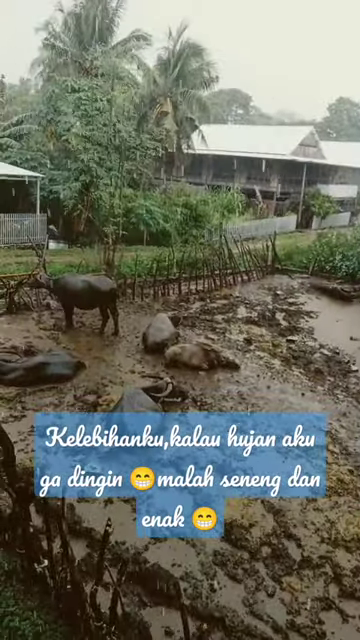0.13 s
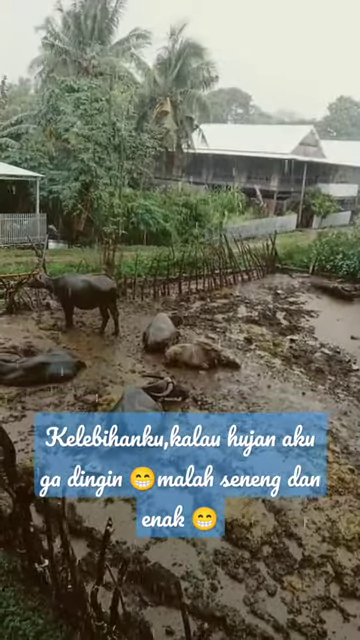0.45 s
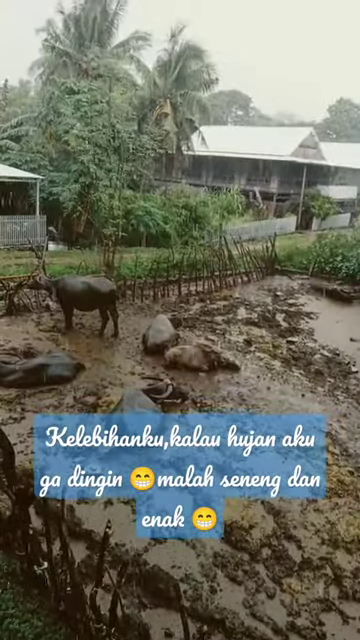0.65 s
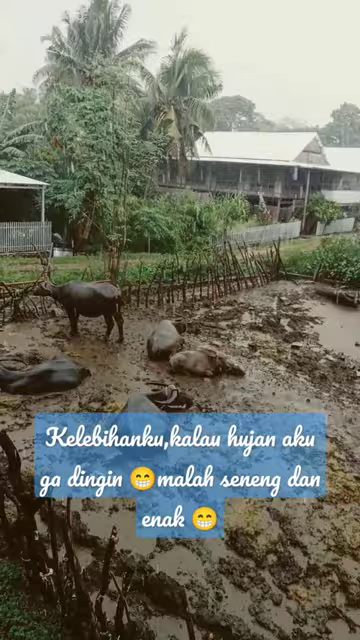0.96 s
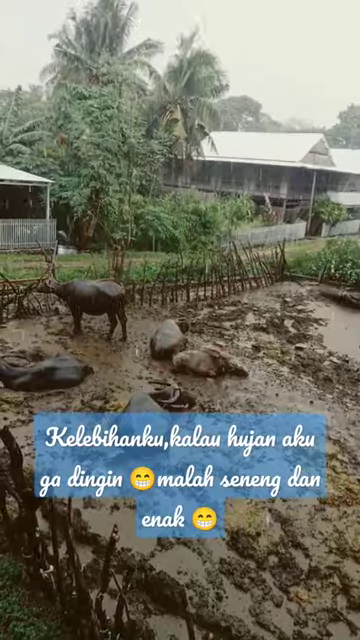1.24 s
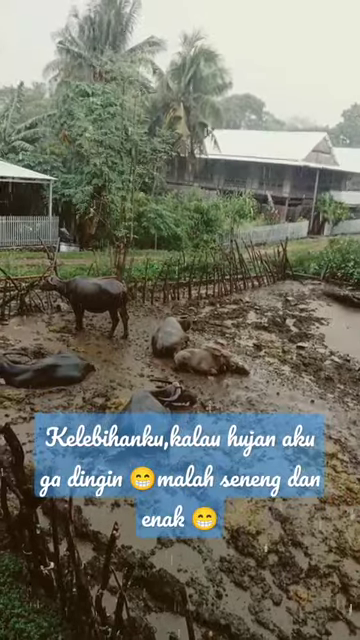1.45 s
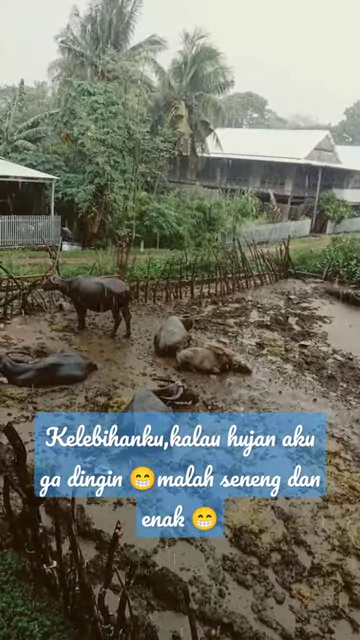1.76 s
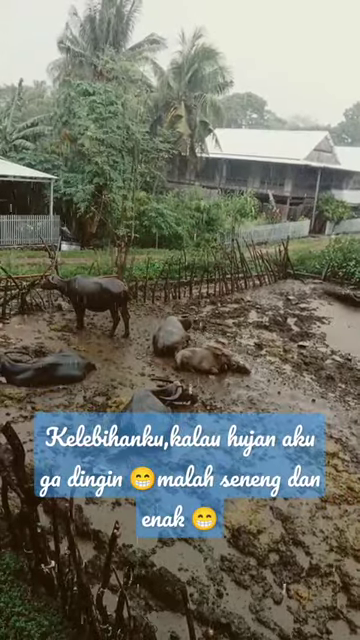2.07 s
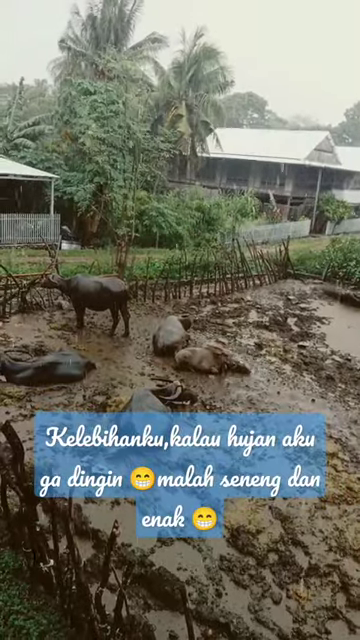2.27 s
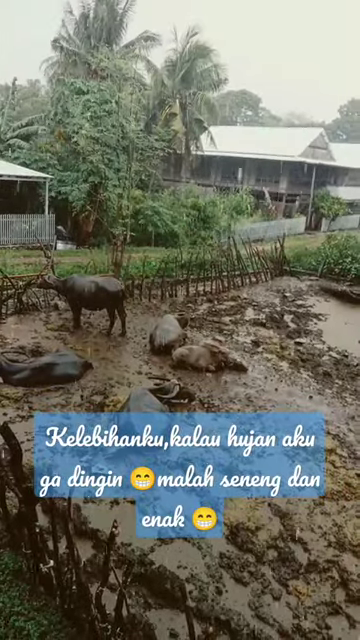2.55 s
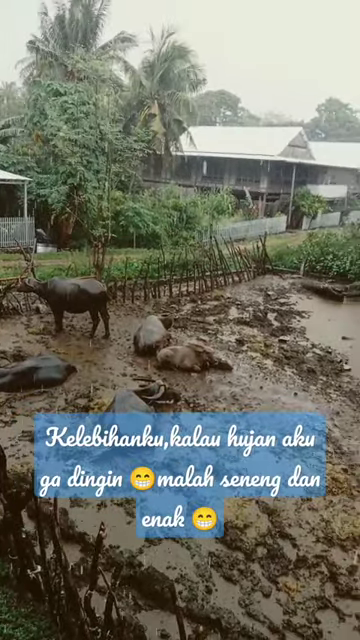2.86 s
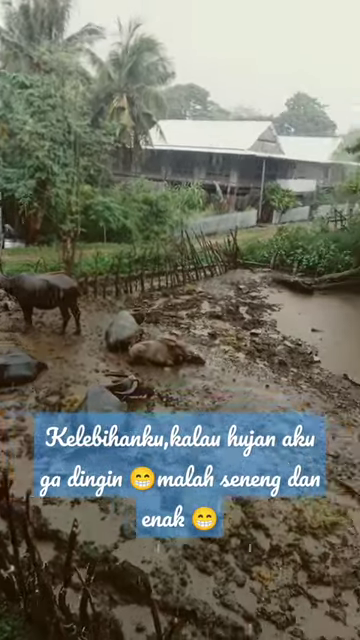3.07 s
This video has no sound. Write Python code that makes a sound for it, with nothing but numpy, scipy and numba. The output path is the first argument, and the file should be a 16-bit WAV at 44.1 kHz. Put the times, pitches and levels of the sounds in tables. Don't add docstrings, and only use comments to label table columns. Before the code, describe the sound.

Steady heavy rain falls on a muddy animal yard, a dense hiss with leaf spatter, puddle plips, scattered near splats and low drips, heard by a phone under a sheet roof.

```python
import sys
import numpy as np
from scipy import signal
from scipy.fft import rfft, irfft
from scipy.io import wavfile
from scipy.ndimage import uniform_filter1d
from numba import njit

SR = 44100
rng = np.random.default_rng(int(sys.argv[2]) if len(sys.argv) > 2 else 0)


def wav_out(sig):
    wavfile.write(sys.argv[1], SR, np.round(np.clip(np.atleast_2d(sig).T, -1, 1) * 32767).astype(np.int16))


def voltage_ratio(level):
    return 10 ** (np.asarray(level, float) / 20)


N = 141561


def unit(x):
    return x / np.sqrt(np.mean(x ** 2))


def band(x, lo_hz, hi_hz):
    edges_hz = [lo_hz, min(hi_hz, .45 * SR)]
    return signal.sosfilt(signal.butter(2, edges_hz, "band", fs=SR, output="sos"), x)


def curve(table, col):
    table = np.array(table)
    return np.interp(np.arange(N) / SR, table[:, 0], table[:, col])


def walk(rate_hz):
    hold = int(SR / rate_hz)
    steps = np.repeat(rng.standard_normal(N // hold + 1), hold)
    return 1.56 * uniform_filter1d(uniform_filter1d(steps, hold), hold)[:N]


@njit
def grains(n, at, w, cycles, glide, size, fade):
    out = np.zeros(n)
    for k in range(len(at)):
        span = int(cycles * 2 * np.pi / w[k])
        phase, start = 0., int(at[k])
        for i in range(min(span, n - start)):
            u = i / span
            phase += w[k] * (1 + glide * (u - .3))
            swell = np.sin(np.pi * u) * np.exp(-fade * (u - .3))
            out[start + i] += size[k] * np.sin(phase) * swell
    return out


def bursts(at, size, tail_s):
    smear_s = 0.0021
    power = np.zeros(N)
    np.add.at(power, np.clip(at, 0, N - 1).astype(int), size ** 2)
    power = signal.lfilter([1], [1, -np.exp(-2 / (tail_s * SR))], power)
    power = uniform_filter1d(power, int(smear_s * SR))
    return np.sqrt(np.maximum(power, 0)) * rng.standard_normal(N)


# (frequency [Hz], density [dB/Hz])
YARD_COLOUR = [(45, -25.5), (90, -20), (240, -7.5), (390, -12.5), (560, -7.5), (800, -4.5), (1500, -3.5),
               (2500, 0)]
# (frequency [Hz], gain [dB])
PORT_COLOUR = [(2700, 0), (3600, -7.5), (5000, -13), (6600, -5), (7600, -14.5), (8600, -25), (10300, -23),
               (12500, -38.5)]


def coloured(x):
    shelter_hz, shelter_wide_hz, shelter_db = 1260, 134, 1.5
    port_top_hz, port_top_wide_hz, port_top_db = 14100, 1700, 5
    hz = np.fft.rfftfreq(N, 1 / SR) + 1
    db = 0
    for table in (YARD_COLOUR, PORT_COLOUR):
        table_hz, table_db = np.array(table).T
        db = db + np.interp(np.log(hz), np.log(table_hz), table_db)

    def bump(mid_hz, wide_hz):
        return 1 / (1 + (2 * (hz - mid_hz) / wide_hz) ** 2)

    shelter = 1 + voltage_ratio(2 * shelter_db) * bump(shelter_hz, shelter_wide_hz) ** 2
    port_top = voltage_ratio(2 * port_top_db * bump(port_top_hz, port_top_wide_hz))
    return irfft(rfft(x) * voltage_ratio(db) * np.sqrt(shelter * port_top), N)


# (time [s], low edge [Hz], high edge [Hz], level [dB])
SPLIT_PATCHES = [
    (.46, 6270, 7600, -48),
    (.46, 12400, 13600, -75),
    (.6, 6300, 7600, -46),
    (.6, 9600, 10800, -56),
    (.62, 9000, 12400, -57),
    (1.62, 9600, 11000, -66),
    (1.645, 13000, 14500, -75),
    (2.2, 8240, 10400, -62),
    (3.2, 9100, 10100, -65),
]


def split_patches():
    patch_s = 0.032
    t, hz = np.arange(N) / SR, np.fft.rfftfreq(N, 1 / SR)
    spec = rfft(rng.standard_normal(N))
    out = np.zeros(N)
    for s, lo_hz, hi_hz, db in SPLIT_PATCHES:
        hiss = unit(irfft(spec * (hz > lo_hz) * (hz < hi_hz), N))
        out += voltage_ratio(db) * np.cos(np.pi * np.clip((t - s) / patch_s, -.5, .5)) * hiss
    return out


# (time [s], peak [dB], pitch [Hz])
WIND_PUFFS = [(0.023, -44, 138), (0.255, -45, 82), (0.489, -75, 145), (0.557, -47, 95), (0.703, -43, 119),
              (1.249, -46, 172), (1.422, -45, 170), (1.52, -44, 142), (1.609, -56, 81.4), (1.829, -62, 139),
              (1.879, -62, 168), (2.131, -43.5, 149), (2.324, -46.5, 135), (2.469, -68, 141),
              (3.169, -61, 170)]


def wind_puffs():
    s, db, hz = np.array(WIND_PUFFS).T
    return grains(N, s * SR, 2 * np.pi * hz / SR, cycles=2.9, glide=0.07, size=voltage_ratio(db - 4), fade=0.6)


# (time [s], level [dB])
SHEET_LEVEL = [(0, -45), (.5, -41.5), (.72, -47.5), (.95, -40), (1.35, -47.5), (1.6, -41.5), (1.95, -44),
               (2.25, -41), (2.45, -41), (2.6, -40.5), (2.8, -46), (3.21, -41)]


def sheet():
    mode_hz, wide_hz = 1260, 98
    hz = np.fft.rfftfreq(N, 1 / SR)
    ring = irfft(rfft(rng.standard_normal(N)) / (1 + (2 * (hz - mode_hz) / wide_hz) ** 2), N)
    return unit(ring) * voltage_ratio(curve(SHEET_LEVEL, col=1) - 2)


# (time [s], level [dB], pitch 30 % of the way in [Hz], length [cycles], pitch rise [share])
GURGLES = [
    (0.78, -56, 135, 28, 1.47),
    (.895, -44.5, 480, 41.6, 0.25),
    (2.9, -53, 190, 27.6, 0.73),
    (3.08, -51, 290, 28.5, 0.17),
    (1.22, -50, 260, 22, 0.35),
]


def gurgles():
    out = np.zeros(N)
    for s, db, hz, cycles, rise in np.array(GURGLES):
        at, w = np.array([s * SR]), np.array([2 * np.pi * hz / SR])
        out += grains(N, at, w, cycles, rise, np.array([voltage_ratio(db)]), 0.22)
    return out


# (time [s], peak [dB], pitch [Hz])
DRIPS = [(0.246, -34, 436), (0.388, -37.5, 264), (0.449, -34.5, 301), (0.797, -37, 229.6),
         (0.919, -34.5, 310), (1.159, -35, 320), (1.26, -40, 511), (1.464, -33, 294), (1.997, -35.5, 466),
         (2.13, -47, 156), (2.249, -36.5, 265), (2.459, -41, 284), (2.579, -38, 245), (2.84, -32.5, 493),
         (2.931, -52, 201), (3.021, -37, 227)]


def drips():
    s, db, hz = np.array(DRIPS).T
    return grains(N, s * SR, 2 * np.pi * hz / SR, cycles=13.7, glide=0.69, size=voltage_ratio(db - 9), fade=1.53)


# (time [s], smack peak [dB], splash level [dB])
SPLATS = [(0.0674, -46, -35), (0.2794, -47, -39), (0.4894, -45, -50), (0.846, -35, -39),
          (0.8799, -37, -37.5), (0.9872, -38, -40), (1.0294, -39, -36), (1.1468, -41, -39),
          (1.2032, -43, -34.5), (1.3468, -72, -48), (1.7194, -46, -48), (1.8791, -42, -41),
          (1.9669, -39, -37), (2.3494, -47, -39), (2.4468, -36, -36), (2.5536, -46, -27.5),
          (2.5984, -35.5, -44), (2.8594, -47, -38), (2.9715, -38, -36), (3.1094, -49, -39)]


def splats():
    smack_db, smack_tail_s = 21, .005
    splash_gain_db, splash_tail_s, splash_lag_s = 8, 0.0075, .007
    s, db, splash_db = np.array(SPLATS).T
    smack = bursts(s * SR, voltage_ratio(db + smack_db), smack_tail_s)
    smack = coloured(band(smack, 10400, 19000))
    excess = voltage_ratio(2 * splash_db) - voltage_ratio(2 * np.median(splash_db))
    splash = bursts((s + splash_lag_s) * SR, np.sqrt(np.maximum(excess, 0)), splash_tail_s)
    return smack + voltage_ratio(splash_gain_db) * band(band(splash, 5600, 7150), 5300, 7700)


def wash():
    swell_db, shared_db, treble_db = .15, .25, .45
    flicker_db, bass_flicker_db = .5, 2.5
    out, swell, treble, shared = 0, walk(2.7), walk(35.03), walk(6)
    spec, hz = rfft(rng.standard_normal(N)), np.fft.rfftfreq(N, 1 / SR) + 1
    for k in range(30):
        mid_hz = 20 * 2 ** (k / 3)
        window = np.cos(np.pi / 2 * np.clip(3 * np.log2(hz / mid_hz), -1, 1)) ** 2
        shared = .8 * shared + .6 * walk(6)
        own = bass_flicker_db * walk(6.77) if mid_hz < 400 else flicker_db * walk(16)
        db = swell_db * swell + shared_db * shared + own
        db = db + treble_db * treble * min(mid_hz / 9000, 1.5)
        out = out + voltage_ratio(db) * irfft(spec * window, N)
    return unit(out)


def ticks(count):
    spread_db, cap, tail_s = 1.5, 4.9, 0.0032
    place, chance = rng.random((count, 2)).T
    size = voltage_ratio(spread_db * np.minimum(-np.log(1 - chance), cap))
    return unit(band(bursts(place * N, size, tail_s), 9500, 25000))


def bubbles(count):
    spread_db = 1.5
    place, pitch, chance = rng.random((count, 3)).T
    hz = 350 + 9000 * pitch ** 1.3
    size = voltage_ratio(-spread_db * np.log(1 - chance))
    w = 2 * np.pi * hz / SR
    return unit(grains(N, place * (N - 1), w, cycles=54., glide=0.042, size=size, fade=2.26))


# (time [s], level [dB])
POUR = [
    (0.0, -32.5),
    (0.02, -33.5),
    (2.52, -35),
    (2.54, -35.5),
    (2.57, -33.5),
    (2.63, -35),
    (3.13, -35),
    (3.16, -34),
    (3.21, -35.5),
]


def downpour():
    rain = wash() + voltage_ratio(-15.5) * bubbles(count=2500) + voltage_ratio(-12) * ticks(count=500)
    return voltage_ratio(curve(POUR, col=1)) * unit(coloured(rain))


def scene():
    mono = wind_puffs() + sheet() + gurgles() + drips() + splats() + downpour()
    return np.array([mono, mono])


def suppress(x):
    contrast, patch_contrast = .12, .06
    bass_contrast, contrast_hz = 0.11, 400
    hz, _, z = signal.stft(x, SR, nperseg=1024, noverlap=768)
    power = uniform_filter1d(np.abs(z) ** 2, size=5, axis=-1) + 1e-18
    ratio = power / power.mean(axis=-1, keepdims=True)
    patch = uniform_filter1d(uniform_filter1d(ratio, size=7, axis=0), size=5, axis=-1) + 1e-9
    exponent = contrast + bass_contrast / (1 + (hz[:, None] / contrast_hz) ** 2)
    gain = ratio ** exponent * np.minimum(patch, 2) ** patch_contrast
    gain = gain / np.sqrt(np.mean(ratio * gain ** 2, axis=-1, keepdims=True))
    return signal.istft(z * gain, SR, nperseg=1024, noverlap=768)[1][:N]


def roll_off(x):
    return signal.sosfilt(signal.butter(12, 15530, fs=SR, output="sos"), x)


def record(dry):
    top_hz, roll_hz, roll_db_per_khz, low_cut_hz = 15060, 14500, -18, 71
    hz = np.fft.rfftfreq(N, 1 / SR) + 1
    treble = (hz < top_hz) * voltage_ratio(roll_db_per_khz * np.maximum(hz - roll_hz, 0) / 1000)
    bass = 1 / np.sqrt(1 + (low_cut_hz / hz) ** 2)
    mono = irfft(rfft(suppress(dry[0])) * treble * bass, N)
    mix = mono + np.array([[1], [-1]]) * split_patches()
    return roll_off(mix)


dry = scene()
out = record(dry)
wav_out(out)
```